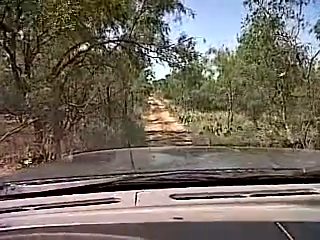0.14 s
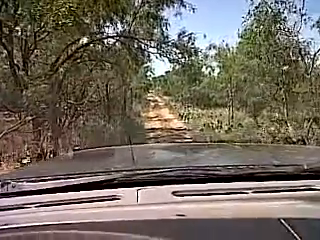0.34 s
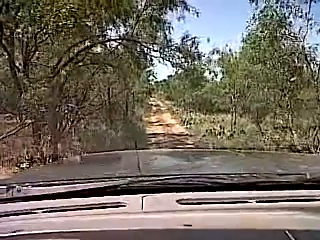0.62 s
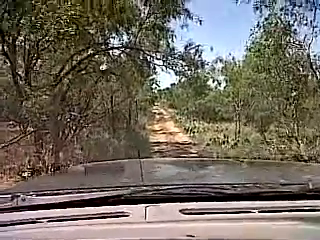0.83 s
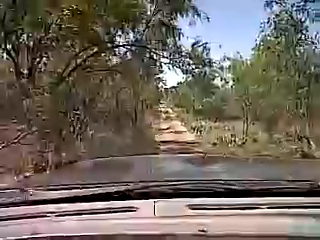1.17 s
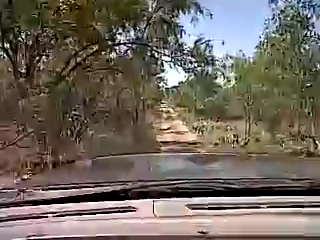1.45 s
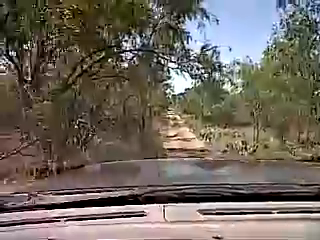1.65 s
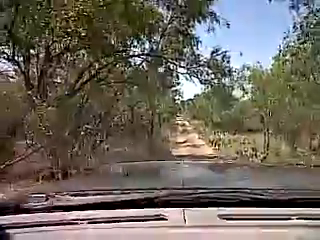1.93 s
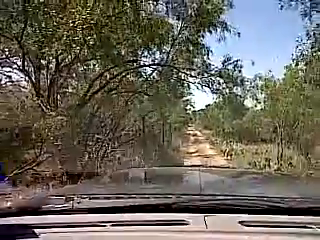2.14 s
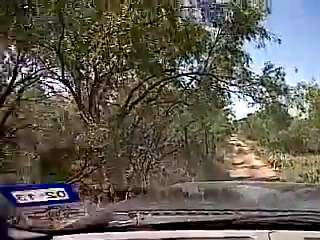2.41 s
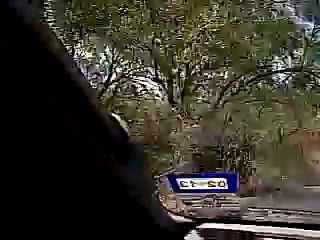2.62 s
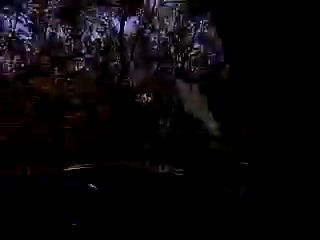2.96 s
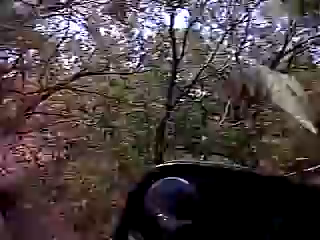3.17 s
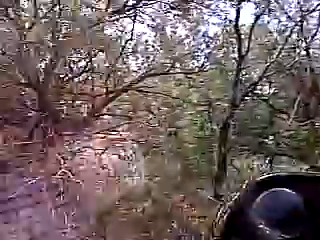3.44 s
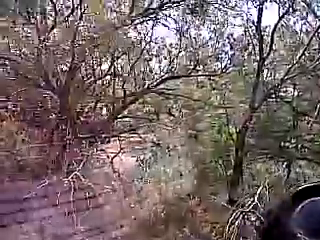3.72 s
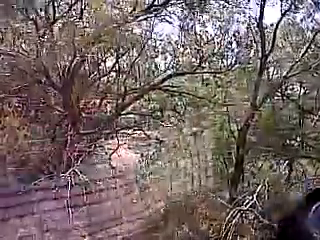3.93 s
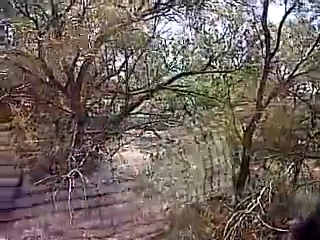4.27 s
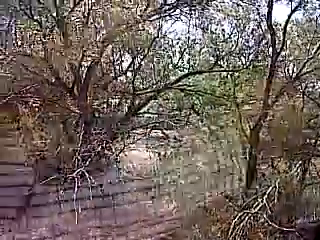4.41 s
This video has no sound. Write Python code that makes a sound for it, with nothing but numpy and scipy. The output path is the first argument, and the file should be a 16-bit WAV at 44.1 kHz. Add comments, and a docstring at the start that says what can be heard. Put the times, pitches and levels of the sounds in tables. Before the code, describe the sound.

Inside a pickup crawling through dry brush, the engine and tyres make a low, boomy rumble with frequent soft thumps. Branches drag faintly along the panels. After about a second, twigs tick on the glass and wood knocks on the metal close by. Midway, low buffeting and brief rubbing groans hit the hand-held microphone. A fitting creaks once, and the thumps and ticks carry on over a faint hiss.

```python
"""Inside a pickup creeping along a dirt track through dry brush; one microphone on a small hand-held camera.
From the start, firings and tyre jolts boom in the cab's air over a faint hiss, and branches drag along the
panels. From 0.9 s twigs tick on the glass and wood knocks on the metal close by; from 2.1 s wind or handling
buffets the microphone and groans low. At 2.7 s the camera swings from the windscreen to the side window,
shifting the boom slightly. At 3.2 s a fitting creaks once, and the thumps and ticks carry on."""
import sys
import numpy as np
from scipy import signal
from scipy.fft import rfft, irfft
from scipy.io import wavfile

SR = 44100
rng = np.random.default_rng(int(sys.argv[2]) if len(sys.argv) > 2 else 0)


def persist_wave(psi):
    """Save psi, clipped to +-1, as 16-bit WAV."""
    counts = np.round(np.clip(psi, -1, 1) * 32767).astype(np.int16)
    wavfile.write(sys.argv[1], SR, np.atleast_2d(counts).T)


N = 202374
T = np.arange(N) / SR


def undb(db):
    """Gain of a level in dB."""
    return 10 ** (np.asarray(db) / 20)


def unit(x):
    """Scaled to rms 1."""
    return x / np.sqrt(np.mean(x ** 2))


def curves(table):
    """Columns of a table joined by straight lines in time."""
    times, *columns = np.transpose(table)
    return [np.interp(T, times, column) for column in columns]


def band(x, hz, width_hz):
    """One resonance, gain 1 at the centre."""
    return signal.lfilter(*signal.iirpeak(hz, hz / width_hz, fs=SR), x)


def ring(x, modes, order):
    """Resonances side by side, alternating in sign; a higher order steepens their flanks."""
    out = 0
    for k, (hz, width_hz, db) in enumerate(modes):
        mode = x
        for _ in range(order):
            mode = band(mode, hz, width_hz * order ** .5)
        out = out + (-1) ** k * undb(db) * mode
    return out


def steady(x, modes, order=2):
    """Resonances that are already ringing at the first sample; rms 1."""
    with_lead_in = np.r_[x[-SR // 4:], x]
    return unit(ring(with_lead_in, modes, order)[SR // 4:])


def grains(per_s, scatter_db):
    """Scattered clicks of either sign and uneven size; rms 1."""
    hit = rng.random(N) < per_s / SR
    clicks = hit * rng.standard_normal(N)
    return unit(clicks * undb(scatter_db * np.minimum(rng.exponential(size=N), 3)))


def burst(t60, rise_s, tail_db=-19):
    """Noise that swells fast and fades by 60 dB in t60, over a weaker tail from the cab's walls."""
    t = T[:SR // 5]
    fade = undb(-60 * t / t60) + undb(tail_db - 60 * t / 0.16)
    return rng.standard_normal(len(t)) * (1 - np.exp(-t / rise_s)) * fade


def add(out, s, sound, db):
    """Lays a sound in at time s with the given peak level."""
    start = int(s * SR)
    out[start:start + len(sound)] += (sound * undb(db) / np.abs(sound).max())[:N - start]


def engine(firing_hz=45.49, jitter=0.01572, uneven_db=3.7):
    """One pulse a firing, slightly uneven in time and strength."""
    timing, strength = rng.standard_normal((int(N / SR * firing_hz), 2)).T
    starts = np.cumsum(SR / firing_hz * (1 + jitter * timing)).astype(int)
    pulses = np.zeros(2 * N)
    pulses[starts] = undb(uneven_db * strength)
    return unit(pulses[:N])


# how hard ground and brush shake the cab: (time [s], boom level [dB], window level [dB])
CAB_SHAKE = [(0.0, -42.5, -60), (0.25, -44.5, -52), (0.47, -42.5, -56.5), (1.01, -45.5, -50),
             (1.24, -42, -61), (1.26, -42.5, -52), (1.81, -44, -55), (2.15, -39.5, -47), (2.8, -42, -53.5),
             (3.1, -36.5, -36), (3.13, -36.5, -42.5), (3.56, -41.5, -45), (4.02, -39.5, -38.5),
             (4.05, -43.5, -44.5), (4.19, -39, -38), (4.27, -44.5, -46.5), (4.56, -39, -34.5),
             (4.59, -41.5, -49)]
# engine hum, and wind or handling on the microphone: (time [s], hum level [dB], buffet level [dB])
DEEP_RUMBLE = [(0.0, -61.5, -67.5), (1.28, -60, -67), (2.09, -43.5, -49.5), (2.3, -35, -32.5),
               (2.35, -61, -45), (2.4, -40, -50), (2.86, -46, -57), (2.94, -52, -46.5), (3.1, -37, -61.5),
               (3.46, -51, -49.5), (3.68, -64.5, -68), (3.74, -51.5, -52), (3.87, -58, -75),
               (4.15, -50.5, -56), (4.47, -58.5, -77), (4.59, -48, -53)]
# resonances at the microphone: the air along and across the cab, dashboard, windows,
# engine hum and the band of the buffeting: (frequency [Hz], width [Hz], gain [dB])
LENGTHWISE_AIR = [(88.9, 19.6, -2.5), (105.9, 20, -3.5), (75, 23, -16)]
CROSSWISE_AIR = [(127, 54, -3.5), (160.9, 28.4, 3), (184.5, 29.8, -4.5)]
DASH_RINGS = [(392, 37.4, -9), (456.1, 45, -8.5)]
WINDOW_RINGS = [(209.3, 47, -1), (250, 25.6, 5.5), (281.4, 53, -11)]
HUM_RING = [(42.2, 26, 0)]
BUFFET_BAND = [(30.2, 60, 0)]
# boom pickup for each aim of the microphone: (lengthwise [dB], crosswise [dB], dashboard [dB])
AIMED_AT_WINDSCREEN = [-1.5, -1, -13]
AIMED_AT_SIDE_WINDOW = [-3, -0.5, -16]


def cab(firing_db=-8, turn_at_s=2.72, turn_length_s=0.22):
    """Firings and tyre jolts ring the cab; wind or handling buffets the microphone, which turns once."""
    firings = engine()
    boom_db, window_db = curves(CAB_SHAKE)
    hum_db, buffet_db = curves(DEEP_RUMBLE)
    turned = np.clip((T - turn_at_s) / turn_length_s, 0, 1)

    def shaken(modes):
        """Modes driven by the firings and by rough ground under the tyres."""
        return steady(undb(firing_db) * firings + grains(per_s=1200, scatter_db=0.83), modes)

    boom = 0
    mode_sets = (LENGTHWISE_AIR, CROSSWISE_AIR, DASH_RINGS)
    for front_db, side_db, modes in zip(AIMED_AT_WINDSCREEN, AIMED_AT_SIDE_WINDOW, mode_sets):
        aim_db = front_db + turned * (side_db - front_db)
        boom = boom + undb(boom_db + aim_db) * shaken(modes)
    hum = steady(firings + 0.96 * rng.standard_normal(N), HUM_RING, order=3)
    buffet = steady(rng.standard_normal(N), BUFFET_BAND)
    return boom + undb(window_db) * shaken(WINDOW_RINGS) + undb(hum_db) * hum + undb(buffet_db) * buffet


# noise floor at the microphone: (frequency [Hz], relative level [dB])
HISS_SPECTRUM = [(880, -14), (1500, -6), (1810, 0), (2610, 1.5), (3000, 3), (3370, 1), (3650, 1),
                 (5650, -2.5), (7110, -4.5), (7500, -29), (9750, -61), (16500, -120)]


def hiss(level_db=-69.5):
    """Steady hiss of the cab's vents and the camera's amplifier."""
    hz, db = np.transpose(HISS_SPECTRUM)
    bin_hz = np.arange(N // 2 + 1) * SR / N + 1
    shape = undb(np.interp(np.log(bin_hz), np.log(hz), db))
    return undb(level_db) * unit(irfft(rfft(rng.standard_normal(N)) * shape, N))


# branches dragging along the outside: (time [s], panel rasp level [dB], leaf rustle level [dB])
BRUSH_CONTACT = [(0.0, -63, -80), (0.89, -61.5, -74.5), (1.51, -61.5, -73.5), (1.9, -60.5, -68),
                 (2.12, -52, -65.5), (2.22, -56.5, -63), (2.34, -63.5, -65.5), (2.38, -59.5, -75.5),
                 (2.53, -62.5, -82), (2.76, -62.5, -78), (3.17, -59.5, -70), (3.31, -57.5, -71),
                 (3.42, -61.5, -72.5), (3.55, -60.5, -68.5), (3.7, -62, -72.5), (4.17, -62.5, -72),
                 (4.59, -61, -80.5)]
# sheet metal and glass, heard from inside: (frequency [Hz], width [Hz], gain [dB])
PANEL_RINGS = [(323, 66, 6), (533, 92, 2.5), (591, 110, 2), (695.5, 130, 0.5), (846, 146, -5.5),
               (972, 144, -3.5), (1200, 140, -5.5), (1384, 490, -10)]
GLASS_RINGS = [(1460, 530, -5.5), (2360, 770, 4.5), (3100, 870, -1.5), (3480, 670, 6), (5220, 1800, -33.5)]


def drag():
    """Wood sticks and slips on the panels, leaves on the glass; harder contact breaks up into grit."""
    rasp_db, rustle_db = curves(BRUSH_CONTACT)
    grit = np.clip((rustle_db + 72.5) / 10, 0, 1)
    slips = rng.standard_normal(N) + 0.96 * grit * grains(per_s=130, scatter_db=-1.5)
    # part of the rustle comes from the same slips that shake the panels
    rustle = 0.46 * slips + grains(per_s=5200, scatter_db=-1.0)
    low_rasp = undb(rasp_db + 1.5) * steady(slips, PANEL_RINGS[:5])
    high_rasp = undb(rasp_db - 5.0 + 3.0 * grit) * steady(slips, PANEL_RINGS[5:])
    splinters = undb(rustle_db - 8.0) * grit * steady(rustle, GLASS_RINGS[4:])
    leaves = undb(rustle_db - 5.5) * steady(rustle, GLASS_RINGS)
    return low_rasp + high_rasp + splinters + leaves


# wheels and limbs thumping the cab: (time [s], peak level [dB], main ring [Hz])
CAB_THUMPS = [(0.119, -35.5, 93), (0.258, -32, 94.2), (0.341, -31.5, 115), (0.528, -32.5, 110),
              (0.579, -35.5, 106.4), (0.849, -32, 131), (0.909, -29, 101.4), (1.099, -31.5, 102),
              (1.232, -34.5, 169), (1.417, -28, 111), (1.529, -30.5, 109), (1.829, -37, 100.4),
              (1.929, -37, 108), (2.019, -26, 106.3), (2.207, -26, 97.5), (2.455, -27, 110),
              (2.619, -36, 86.6), (2.873, -31, 188), (2.988, -29, 151), (3.069, -23, 168), (3.189, -31, 99),
              (3.339, -32, 105), (3.579, -32, 176.4), (3.741, -28.5, 192), (3.809, -29, 205),
              (3.987, -31, 221), (4.167, -31, 201), (4.455, -26, 176), (4.53, -31, 248)]


def bumps(width_hz=42, air_modes_db=-6.5):
    """A soft push rings the air around the microphone, most at one pitch."""
    out = np.zeros(N)
    for s, db, hz in CAB_THUMPS:
        blow = burst(t60=0.11, rise_s=0.0091)
        add(out, s, ring(blow, [(hz, width_hz, 0)], order=3), db)
        add(out, s, ring(blow, LENGTHWISE_AIR + CROSSWISE_AIR, order=3), db + air_modes_db)
    return out


# twigs on the glass close by:
# (time [s], peak level [dB], main ring [Hz], relative crack [dB], relative woody body [dB])
TWIG_TICKS = [(0.8844, -52.5, 2790, -28, -9), (1.0145, -49, 2820, -27, -16), (1.2555, -49.5, 3760, -31, -4),
              (1.5325, -46.5, 2920, -16, -7), (1.6222, -53.5, 3520, -31, 4), (1.6792, -47.5, 3120, -35, -5),
              (1.725, -54, 3440, -14, 4), (1.7436, -49.5, 2720, -8, -7), (1.754, -40, 2650, -9.5, -31),
              (1.7955, -44, 3750, -41, -7), (1.8482, -59, 3500, -7, -6), (1.9072, -51, 3740, -35, -13),
              (1.9574, -48, 2920, -7, -19), (1.9983, -52.5, 2500, -6, -6), (2.1283, -49, 2900, -20, -10),
              (2.159, -48.5, 3200, -11, -5), (2.1754, -47, 2960, -11, -9), (2.1973, -41.5, 3070, -15, -4.5),
              (2.2188, -52, 3350, -6, 2), (2.2867, -62, 2420, 2, -23), (2.311, -44.5, 3150, -13.5, -12),
              (2.3254, -59.5, 2600, -4, -18), (2.942, -59, 2350, -4, -1.5), (3.1165, -59, 2220, -1, 9.5),
              (3.274, -41.5, 3150, -43, -8), (3.4101, -36, 3180, -30, -7), (3.4158, -54, 2550, -18, -21),
              (3.5372, -61, 2180, -19, 9), (3.781, -49.5, 3400, -30, 0), (3.7937, -57.5, 2730, 5, 1.5),
              (4.121, -40.5, 2970, -45, -5.5), (4.2298, -41.5, 2960, -45, -11)]


def ticks(longest_gap_s=0.03, quietest_db=-62, width_hz=520):
    """A splintering twig rings the glass, most at one pitch, between a thin crack and a woody body."""
    rustle_db = curves(BRUSH_CONTACT)[1]
    gaps, *traits = rng.random(size=(450, 4)).T
    patter = []  # small twigs at random, louder as the leaves press harder
    for s, softness, pitch, dullness in zip(np.cumsum(longest_gap_s * gaps), *traits):
        if s >= T[-1]:
            break
        db = rustle_db[int(s * SR)] + 8.5 - 12 * softness
        if db > quietest_db:
            patter.append((s, db, 2200 + 1600 * pitch, -2 - 14 * dullness, -6))
    out = np.zeros(N)
    for s, db, hz, crack_db, body_db in TWIG_TICKS + patter:
        blow = burst(t60=0.03, rise_s=0.00092, tail_db=-20.5)
        add(out, s, ring(blow, [(hz, width_hz, 0)], order=3), db)
        add(out, s, ring(blow, GLASS_RINGS[1:4], order=3), db)
        add(out, s, ring(blow, GLASS_RINGS[4:], order=3), db + crack_db)
        add(out, s, ring(blow, GLASS_RINGS[:1], order=3), db + body_db)
    return out


# branches striking the bodywork:
# (time [s], peak level [dB], main ring [Hz], relative panel ring [dB], 60 dB fade [s])
BRANCH_KNOCKS = [(0.901, -45.5, 382, -4.5, 0.13), (1.15, -53, 431, 5.5, 0.13), (1.257, -53.5, 377, 4, 0.11),
                 (1.483, -42, 398, 3, 0.14), (1.629, -52.5, 433, 7, 0.08), (1.75, -45.5, 560, 5, 0.05),
                 (1.796, -45, 473, 0.5, 0.12), (1.852, -51.5, 463, -12, 0.06), (1.903, -48, 440, 4, 0.069),
                 (1.982, -39, 412, -8, 0.24), (2.134, -43, 530, -6, 0.025), (2.161, -42, 434, -1, 0.1),
                 (2.219, -40, 330, -1, 0.14), (2.253, -39, 465, -25, 0.076), (2.451, -44, 380, -5, 0.19),
                 (2.766, -55, 458, 7, 0.09), (3.063, -37.5, 350, -36.5, 0.062),
                 (3.792, -29, 417, -7.5, 0.025), (4.12, -43.5, 413, -6, 0.064)]


def knocks(width_hz=110):
    """Thicker wood thumps the sheet metal just outside: a hollow note and the ring of the panels."""
    out = np.zeros(N)
    for s, db, hz, panel_db, t60 in BRANCH_KNOCKS:
        blow = burst(t60, rise_s=0.0046)
        add(out, s, ring(blow, [(hz, width_hz, 0)], order=2), db)
        add(out, s, ring(blow, PANEL_RINGS[3:], order=2), db + panel_db)
    return out


# handling or wind right on the camera: (time [s], length [s], low level [dB], high level [dB])
RUB_GROANS = [(2.094, .06, -49, -64.5), (2.228, 0.065, -38.5, -64), (2.865, 0.032, -49, -74),
              (2.953, 0.087, -39, -54.5), (3.049, 0.21, -43.5, -58)]
# the groan's resonances: (frequency [Hz], width [Hz], gain [dB])
LOW_GROAN_RINGS = [(299, 93, 0.0038), (369, 79, 0)]
HIGH_GROAN_RING = [(608, 45, 0)]


def groans(edge_s=0.024):
    """Handling or wind on the camera makes short, low, coarse rubbing groans."""
    low = steady(grains(per_s=930, scatter_db=2.5), LOW_GROAN_RINGS)
    high = steady(grains(per_s=930, scatter_db=2.5), HIGH_GROAN_RING)
    out = 0
    for s, length_s, low_db, high_db in RUB_GROANS:
        rubbing = np.clip(np.minimum(T - s, s + length_s + edge_s - T) / edge_s, 0, 1)
        out = out + rubbing * (undb(low_db) * low + undb(high_db) * high)
    return out


def creak(at_s=3.24, length_s=0.078, start_hz=401, rise_hz_per_s=800, level_db=-42):
    """A fitting's rubbing joint sings one short rising note; its octave flares for a moment."""
    t = np.clip(T - at_s, 0, length_s)
    uneven_slip = 1 + 0.0385 * unit(band(rng.standard_normal(N), hz=60, width_hz=80))
    hz = (start_hz + rise_hz_per_s * t) * uneven_slip
    phase = 2 * np.pi * np.cumsum(hz) / SR
    octave_flare = undb(-4.5) * np.exp(-((t - 0.041) / 0.017) ** 2)
    tone = 2 ** .5 * (np.sin(phase) + octave_flare * np.sin(2 * phase))
    swell = np.sin(np.pi * t / length_s)
    waver_db = 1.7 * unit(band(rng.standard_normal(N), hz=35, width_hz=57))
    return swell * undb(level_db + waver_db) * tone


def scene():
    """All sources as they meet at the single microphone inside the cab."""
    return (cab() + bumps() + drag() + groans() + ticks() + knocks() + creak() + hiss())[None]


def record(dry):
    """The camera's microphone has a narrow dip in the treble and a low, steep ceiling."""
    mic_top_hz, ceiling_hz = 7250, 7930
    dipped = dry - 0.94 * band(dry, hz=4030, width_hz=110)
    dull = signal.sosfilt(signal.ellip(8, .3, 45, mic_top_hz, fs=SR, output="sos"), dipped)
    return signal.sosfilt(signal.ellip(8, .2, 70, ceiling_hz, fs=SR, output="sos"), dull)


dry = scene()
out = record(dry)
persist_wave(out)
```